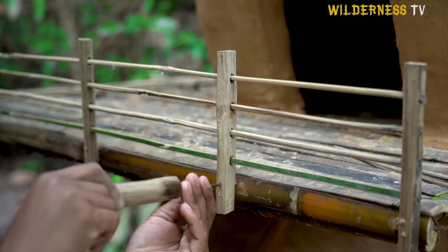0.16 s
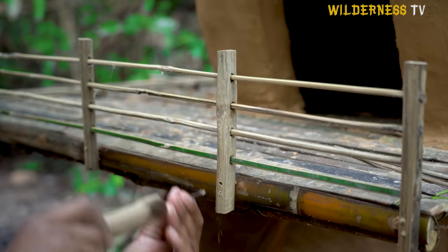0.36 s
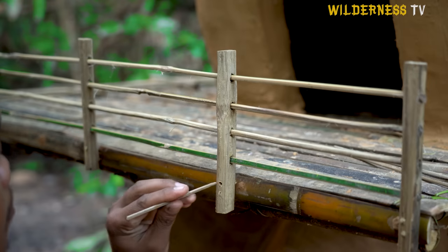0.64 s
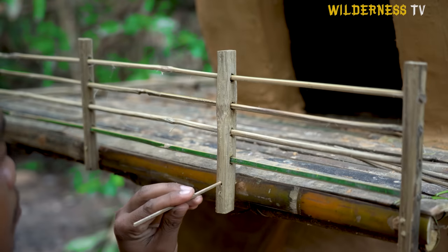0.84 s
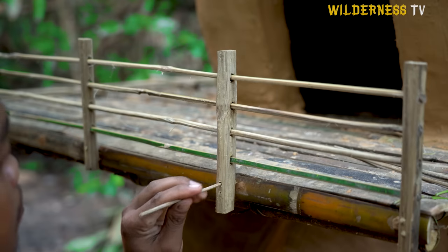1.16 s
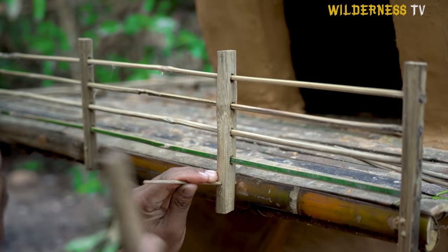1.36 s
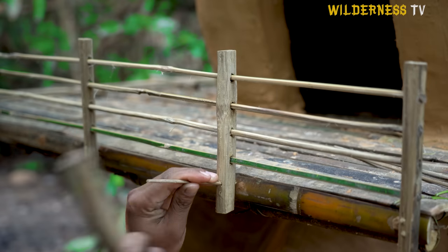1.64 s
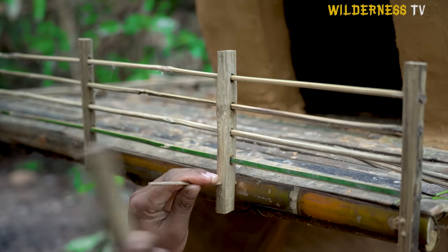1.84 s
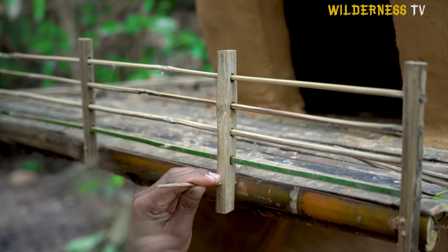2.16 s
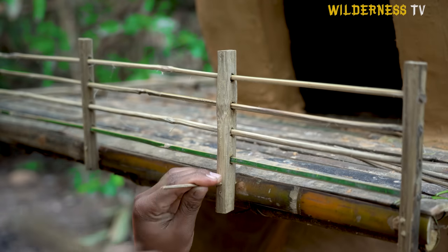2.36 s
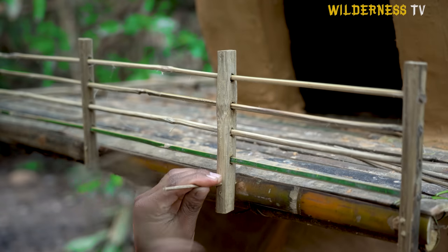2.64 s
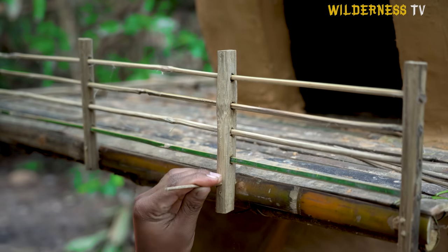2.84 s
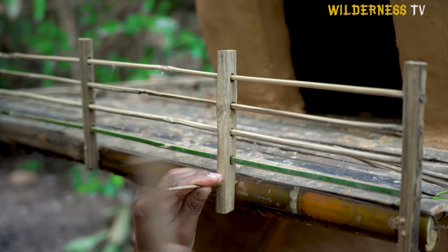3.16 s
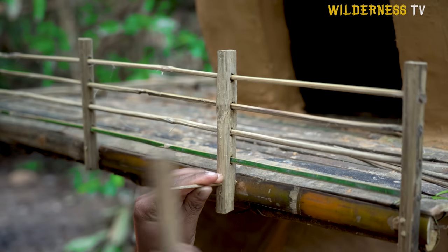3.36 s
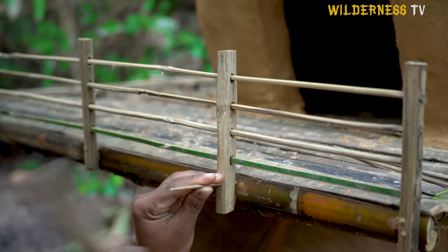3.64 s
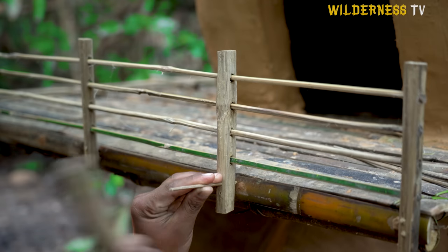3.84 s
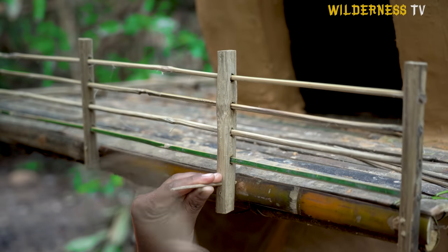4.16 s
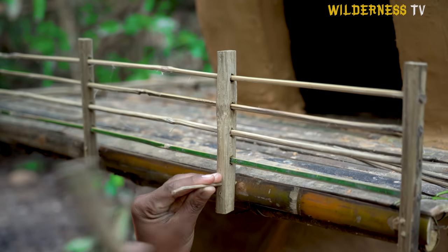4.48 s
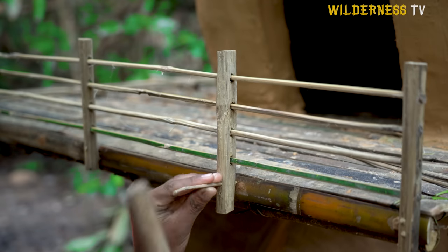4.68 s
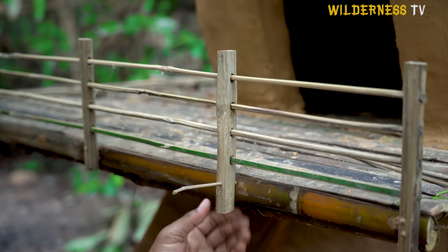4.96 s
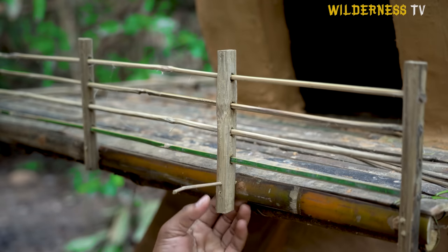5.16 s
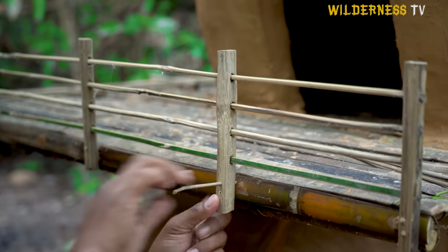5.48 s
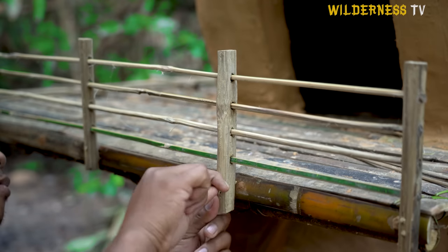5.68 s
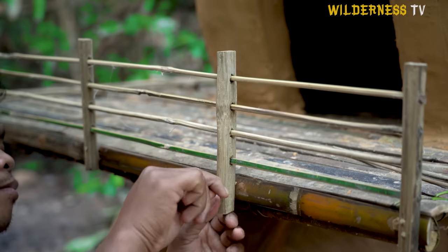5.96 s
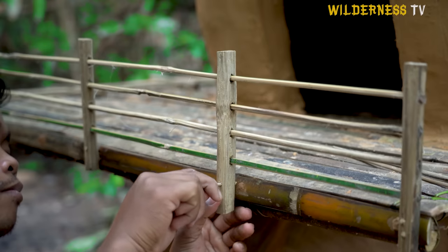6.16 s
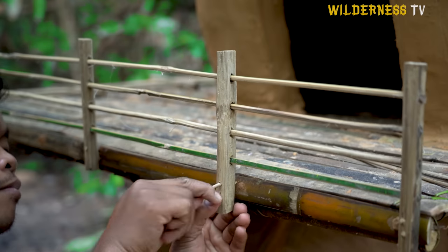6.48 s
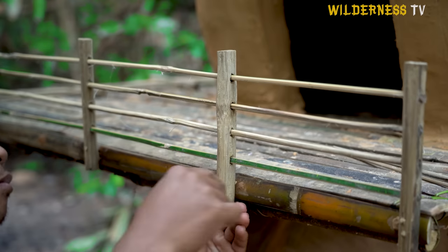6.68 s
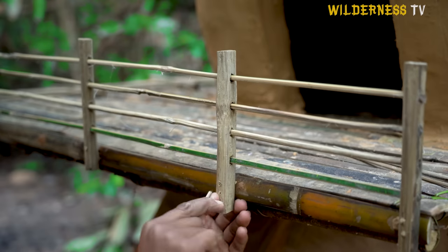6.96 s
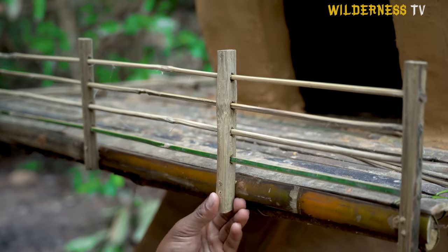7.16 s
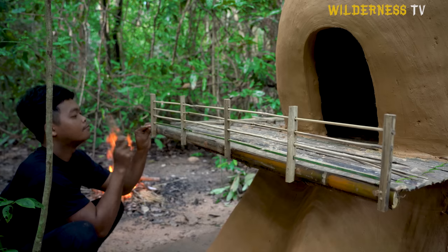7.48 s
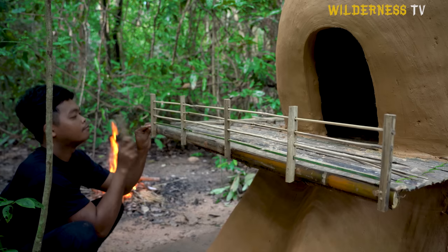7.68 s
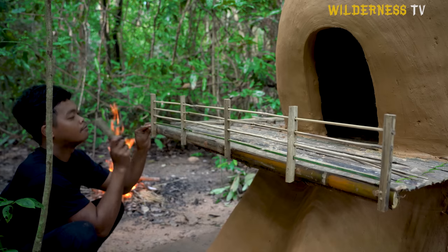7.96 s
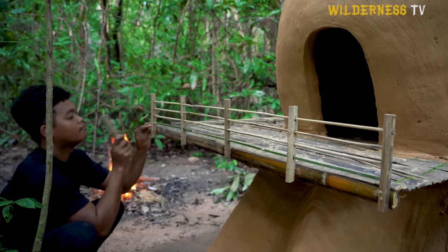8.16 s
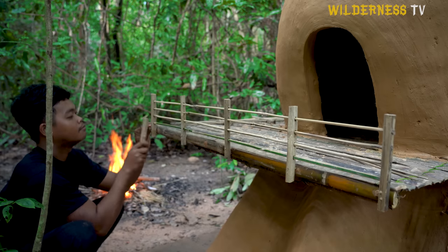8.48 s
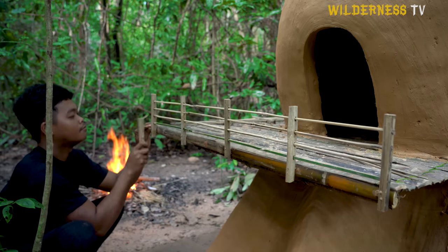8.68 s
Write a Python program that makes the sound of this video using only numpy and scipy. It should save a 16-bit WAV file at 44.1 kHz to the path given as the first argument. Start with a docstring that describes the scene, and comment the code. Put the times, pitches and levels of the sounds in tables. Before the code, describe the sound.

Close stereo microphones, outdoors among trees. Soft handling rustle, then a quick steady run of cracking wooden blows with a short ringing echo. A gap follows, with melodic slurred whistles and several dry bamboo snaps. Hammering resumes on another, hollower post, one blow clattering with a quick bounce. Raspy chirps, air and a high insect band run throughout.

```python
"""Mallet and bamboo in a forest

Close to the microphones a wooden mallet drives a peg into a bamboo railing; the peg's end is snapped off,
then a second post is hammered. Blows are ringing modes with a noise crack and a wash of echo; snaps are gritty noise.
Birds whistle, warble and chirp among the trees as gliding tones, over insects and still air made of shaped noise.
The recorder's limiter ducks the loudest peaks, so the forest's echo swells up behind the hard blows."""
import sys
import numpy as np
from scipy import signal
from scipy.fft import rfft, irfft, next_fast_len
from scipy.io import wavfile
from scipy.ndimage import uniform_filter1d, minimum_filter1d

SR = 44100
rng = np.random.default_rng(int(sys.argv[2]) if len(sys.argv) > 2 else 0)


def master(y):
    """Save y as 16-bit WAV."""
    cut = np.clip(np.atleast_2d(y).T, -1, 1)
    pcm = np.round(cut * 32767)  # scale
    wavfile.write(sys.argv[1], SR, pcm.astype(np.int16))


N = 389403
TIME = np.arange(N) / SR
ALONG = np.linspace(0, 1, 33)  # progress through a note, 0-1

# mallet on the peg, before the overall blow level:
# (time [s], force [dB], hollow middle [dB], treble [dB], top [dB])
PEG_BLOWS = [(1.6071, -6, -18.5, -2.5, -6), (1.841, -4.5, -0.5, 4, -5.5), (2.059, -2, -1.5, 2.5, 4),
             (2.2816, -1, -7, 5, 0.5), (2.5045, 11.5, -11, -1, 2.5), (2.743, 16, -13.5, -3, 4),
             (2.9822, 14.5, -11, 1, 5), (3.2034, 13.5, -8, 2, 8), (3.4232, 13, -7, 1.5, 6.5),
             (3.633, 10.5, -1.5, 2.5, 7), (3.8367, 9.5, 0.5, -8.5, -4), (4.053, 11, -6.5, -6, -19),
             (4.2716, 3.5, -6.5, -15, 6), (4.5039, 15, -16, -11, -9), (4.7045, -4.5, 0.5, -1.5, 19)]
# early echoes off near trunks: (delay [s], level against the direct sound [dB])
TRUNK_ECHOES = [(.012, -4.5), (.027, -7.5), (0.057, -18)]


def from_db(db):
    """Decibels to gain."""
    return 10 ** (np.asarray(db) / 20)


def at_hz(points, hz):
    """Read a curve on a log-frequency axis."""
    knots, values = np.transpose(points)
    return np.interp(np.log(np.maximum(hz, 1)), np.log(knots), values)


def add(out, s, sound):
    """Mix a sound in at a time in seconds."""
    start = max(round(s * SR), 0)
    out[:, start:start + sound.shape[-1]] += sound[..., :N - start]


def dying(t, t60):
    """Exponential decay, falling 60 dB in t60 seconds."""
    return np.exp(-np.log(1000) * t / t60)


def unit_energy(x):
    """Scale to a mean energy of one per channel."""
    return x / np.sqrt(np.mean(np.sum(x ** 2, axis=-1)))


def cut(x, hz, kind, order=2):
    """Butterworth filter."""
    return signal.sosfilt(signal.butter(order, hz, kind, fs=SR, output="sos"), x)


def bell(x, hz, q, db):
    """Lift or lower a band around hz, narrower for a higher q."""
    root_gain = from_db(db / 2)
    w = 2 * np.pi * min(hz, SR / 2 - 1) / SR
    k = np.sin(w) / (2 * q)
    top = [1 + k * root_gain, -2 * np.cos(w), 1 - k * root_gain]
    bottom = [1 + k / root_gain, -2 * np.cos(w), 1 - k / root_gain]
    return signal.lfilter(top, bottom, x)


def drift(rate, size):
    """Random wander: straight lines between normal draws, rate of them per second."""
    steps = np.arange(size) * rate / SR
    knots = np.arange(size // 20 + 2)
    return np.interp(steps, knots, rng.standard_normal(len(knots)))


def diffuse(spectrum, size):
    """Stereo noise from all around, alike in the bass and nearly unrelated in the treble."""
    # likeness of left and right: (frequency [Hz], likeness [0-1])
    likeness = [(60, 1), (500, 0.79), (1200, 0.44), (2500, 0.29), (5000, 0), (16000, 0.1)]
    length = next_fast_len(size) * 2
    hz = np.fft.rfftfreq(length, 1 / SR)
    mid, side = rfft(rng.standard_normal((2, length)))
    alike = np.clip(at_hz(likeness, hz), 0, 1)
    pair = np.sqrt(1 + alike) * mid + np.sqrt(1 - alike) * side * [[1], [-1]]
    return irfft(pair * from_db(at_hz(spectrum, hz)) * np.sqrt(SR) / 2)[:, :size]


def forest(x, linger, build_s):
    """Countless trunks and leaves scatter the sound back; each octave dies at its own rate."""
    # colour of the echo: (frequency [Hz], relative level [dB])
    echo_colour = [(150, 15.5), (700, -9), (1800, -4.5), (4000, 1), (8500, 10.5), (15000, 5)]
    # its decay before linger stretches or shortens it: (frequency [Hz], t60 [s])
    echo_decay = [(150, 0.38), (1000, 0.5), (3500, 0.54), (9000, 0.32), (16000, 0.16)]
    t, edges = TIME[:SR], 80 * 2. ** np.arange(9)
    scatter = diffuse(echo_colour, size=SR)
    tail = np.zeros((2, SR))
    for lo, hi in zip(edges, edges[1:]):
        t60 = linger * at_hz(echo_decay, np.sqrt(lo * hi))
        tail += cut(scatter, [lo, hi], "band") * dying(t, t60)
    response = unit_energy(tail * (1 - np.exp(-t / build_s)))
    return signal.fftconvolve(x, response, axes=-1)[:, :N]


def mallet(blows, modes, level_db, crack_db, crack_s, echo_db, echo_t60, slap_db, slap_t60,
           contact_s, spread, vary_db, low_hz):
    """Each blow rings the modes with a contact crack; a slap off the hut and a wash from the trees follow."""
    # splintery crack of the contact: (frequency [Hz], relative level [dB per Hz])
    crack_spectrum = [(100, -41), (350, -45), (900, -5), (2000, 2.5), (4000, 5), (6500, -2), (10000, -7.5),
                      (15000, -23)]
    # a blow as it comes back from all sides: (frequency [Hz], relative level [dB per Hz])
    wash_spectrum = [(100, -30), (350, -15.5), (600, -9.5), (1000, -9), (1800, -4), (2800, -2),
                     (3900, -0.5), (4500, -0.5), (5600, -5.5), (7300, -8.5), (8800, -8), (10000, -12.5),
                     (11500, -17.5), (15000, -29)]
    # narrow bands where the wash rings on or is softened: (frequency [Hz], Q [-], gain [dB])
    wash_bands = [(2100, 11, -1), (3800, 27, 4), (8570, 16, 4)]
    out, t = np.zeros((2, N)), TIME[:SR // 2]
    hz, width, mode_db = np.transpose(modes)[:, :, None]
    # higher modes reach the two microphones further out of step
    lag = spread * np.minimum(hz / 4000, 1) * rng.choice([-1, 1], hz.shape)
    phase = rng.uniform(0, 2 * np.pi, hz.shape) + lag * np.array([1, -1])[:, None, None]
    rings = from_db(mode_db) * width * np.exp(-np.pi * width * t) * np.sin(2 * np.pi * hz * t + phase)
    onset = 1 - np.exp(-t / contact_s)
    slap_fade = from_db(slap_db) * unit_energy(dying(t, slap_t60))
    fade = from_db(echo_db) * unit_energy(dying(t, echo_t60)) + slap_fade
    for s, force_db, middle_db, treble_db, top_db in blows:
        mode_gains = from_db(vary_db * rng.standard_normal(hz.shape))
        body = unit_energy((rings * mode_gains).sum(axis=1) * onset)
        # the wood slips in its hole for a few milliseconds, then grips
        grip = np.exp(-(t / crack_s) ** 4)
        crack = unit_energy(diffuse(crack_spectrum, size=len(t)) * onset * grip)
        wash = diffuse(wash_spectrum, size=len(t))
        for band_hz, q, band_db in wash_bands:
            wash = bell(wash, band_hz, q, band_db)
        knock = body + from_db(crack_db) * crack + wash / wash.std() * fade * onset
        knock = bell(knock, 1055, 0.71, middle_db)
        knock = bell(knock, 8300, 0.94, treble_db)
        knock = bell(knock, 12870, 1.33, top_db)
        add(out, s, from_db(level_db + force_db) * cut(knock, low_hz, "high"))
    return out


def rail_twang(level_db, start_hz, end_hz, settle_s, t60):
    """Blows set the thin rails swinging until the peg is seated; the pitch sinks as the swing dies."""
    follows, seated_s = 0.72, 4.2  # share of a blow's force dB; time of the seating
    out, t = np.zeros((2, N)), TIME[:SR // 4]
    pitch = end_hz + (start_hz - end_hz) * np.exp(-t / settle_s)
    swing = np.sin(2 * np.pi * np.cumsum(pitch) / SR)
    twang = swing * dying(t, t60) * (1 - np.exp(-t / settle_s))
    for s, force_db, *colour in PEG_BLOWS:
        if s < seated_s:
            add(out, s, from_db(level_db + follows * force_db) * twang)
    return out


def handling(top_hz, bump_t60):
    """Bamboo fibres break in gritty bursts of noise; hands knock dully on the deck."""
    # bamboo handled and snapped: (time [s], starting level [dB], t60 [s], lowest frequency [Hz])
    snaps = [(0.003, -32.5, 0.5, 3500), (0.464, -34, 0.3, 3000), (0.491, -36, 0.19, 3000),
             (1.655, -28.5, 0.024, 4020), (5.197, -29, 0.11, 2500), (5.243, -17.5, 0.038, 3400),
             (6.374, -16.5, 0.036, 2400), (6.388, -24, 0.15, 2400), (6.407, -16.5, 0.11, 2400),
             (6.788, -20.5, 0.025, 2400), (6.795, -12, 0.071, 2380), (6.998, -30.5, 0.072, 3000),
             (8.306, -35, 0.14, 5000)]
    # hands bump the deck: (time [s], starting level [dB], frequency [Hz])
    bumps = [(0.408, -36.5, 610), (5.198, -36.5, 243), (5.245, -31.5, 650), (5.262, -39, 245),
             (5.261, -38.5, 990)]
    out, t = np.zeros((2, N)), TIME[:SR // 5]
    for s, db, t60, low_hz in snaps:
        grit = from_db(4 * drift(1500, size=len(t)))
        fibres = rng.standard_normal((2, len(t))) * grit
        fibres = cut(fibres, low_hz, "high")
        fibres = cut(fibres, min(top_hz, SR / 2 - 1), "low", order=1)
        add(out, s, from_db(db) * fibres / fibres.std() * dying(t, t60))
    for s, db, hz in bumps:
        thud = cut(rng.standard_normal(len(t)), [hz / 1.3, hz * 1.52], "band")
        add(out, s, from_db(db) * thud / thud.std() * dying(t, bump_t60))
    return out


def whistle(note, waver, waver_rate, flutter_db, edge_s=0.0018):
    """A near-pure tone gliding through its points; a fast waver turns it into a rasp."""
    s, hz, db = np.transpose(note)
    t = TIME[:SR // 2] + s[0]
    glide = uniform_filter1d(np.interp(t, s, hz), SR // 150)
    pitch = glide * (1 + waver * drift(waver_rate, size=len(t)))
    gate = np.clip(np.minimum(t - s[0], s[-1] + edge_s - t) / edge_s, 0, 1)
    level = from_db(np.interp(t, s, db) + flutter_db * drift(75.3, size=len(t)))
    return np.sqrt(2) * level * gate * np.sin(2 * np.pi * np.cumsum(pitch) / SR)


def swell(s, length, start_hz, end_hz, db):
    """A long note rises, quickly at first, while its pitch glides ever faster; rows of (s, Hz, dB)."""
    swell_db, swell_power, glide_power = 20, 5.1, 1.4  # starts swell_db down
    pitch = start_hz + (end_hz - start_hz) * ALONG ** glide_power
    return np.transpose([s + length * ALONG, pitch, db - swell_db * (1 - ALONG) ** swell_power])


def slur(s, length, start_hz, middle_hz, end_hz, db):
    """A short note bends through one smooth arc, loudest in its middle; rows of (s, Hz, dB)."""
    edge_db = 5  # softer by this at both ends
    pitch = start_hz + (end_hz - start_hz) * ALONG
    edge = (2 * ALONG - 1) ** 2
    bend = (middle_hz - (start_hz + end_hz) / 2) * (1 - edge)
    return np.transpose([s + length * ALONG, pitch + bend, db - edge_db * edge])


def trills():
    """The same slur again and again at an even pace."""
    # before the birds' mix levels: (from [s], until [s], period [s], note length [s],
    # start pitch [Hz], middle pitch [Hz], end pitch [Hz], level [dB])
    trill_rows = [(2.161, 2.21, .034, 0.028, 1835, 2018, 1930, -30.5),
                  (2.392, 2.52, .058, .042, 1604, 2740, 3100, -30),
                  (5.938, 6.235, .088, .042, 1724, 1860, 1890, -31.5)]
    return [slur(s, *note) for start, until, period, *note in trill_rows
            for s in np.arange(start, until, period)]


def sing(notes, waver, waver_rate, flutter_db):
    """Lay whistled notes out in time."""
    out = np.zeros((2, N))
    for note in notes:
        add(out, note[0][0], whistle(note, waver, waver_rate, flutter_db))
    return out


def off_trunks(x):
    """The sound with its early echoes off near trunks."""
    out = x.copy()
    for delay, db in TRUNK_ECHOES:
        add(out, delay, from_db(db) * x)
    return out


def songbirds(direct_db, echo_db, far_direct_db, far_echo_db, pan_db):
    """Fluting phrases, pure in the whistles and raspy in the trills; far birds arrive mostly as echo."""
    # all levels stand before the direct and echo gains
    # near bird's long swelling whistles:
    # (time [s], length [s], start pitch [Hz], end pitch [Hz], level [dB])
    near_whistles = [(1.459, .38, 1877, 1585, -41), (1.90, 0.16, 1629, 1474, -32.5),
                     (5.505, 0.36, 1970, 2185, -33)]
    # its short slurred notes:
    # (time [s], length [s], start pitch [Hz], middle pitch [Hz], end pitch [Hz], level [dB])
    near_slurs = [(2.134, 0.031, 2230, 1940, 1860, -35), (2.188, 0.038, 1877, 2025, 2150, -26.5),
                  (2.303, .04, 1234, 1565, 2790, -37.5), (2.338, 0.042, 2850, 3040, 2900, -22),
                  (5.821, 0.042, 2216, 2287, 2260, -26), (6.239, 0.095, 1898, 2257, 2403, -27.5),
                  (6.342, 0.048, 2380, 2320, 2036, -23.5), (6.35, 0.061, 2327, 2440, 2480, -27.5),
                  (6.547, 0.09, 2200, 1828, 1660, -25), (6.806, 0.071, 2200, 1880, 1580, -24.5),
                  (7.005, 0.057, 2033, 2142, 2110, -25.5), (7.055, 0.0266, 2110, 1923, 1560, -30)]
    # whistles further off: (time [s], length [s], start pitch [Hz], end pitch [Hz], level [dB])
    far_whistles = [(2.542, .36, 940, 870, -53)]
    # slurs further off:
    # (time [s], length [s], start pitch [Hz], middle pitch [Hz], end pitch [Hz], level [dB])
    far_slurs = [(6.472, 0.074, 1413, 1300, 1230, -32.5), (6.72, 0.064, 1345, 1330, 1140, -30),
                 (6.949, 0.037, 1170, 1144, 1360, -29), (7.149, 0.032, 1050, 1176, 1445, -31.5),
                 (7.222, 0.073, 1247, 1330, 1280, -37), (7.406, 0.052, 1325, 1183, 1210, -31.5),
                 (7.491, .065, 1584, 1460, 1250, -37.5)]
    near = sing([swell(*row) for row in near_whistles], waver=.006, waver_rate=200, flutter_db=1.8)
    near += sing([slur(*row) for row in near_slurs], waver=.018, waver_rate=260, flutter_db=3.2)
    near += off_trunks(sing(trills(), waver=.04, waver_rate=700, flutter_db=3.5))
    far_notes = [swell(*row) for row in far_whistles] + [slur(*row) for row in far_slurs]
    far = sing(far_notes, waver=.022, waver_rate=200, flutter_db=3)
    to_forest = from_db(echo_db) * near + from_db(far_echo_db) * far
    echo = forest(to_forest, linger=1.28, build_s=0.0018)
    direct = from_db(direct_db) * near + from_db(far_direct_db) * far
    return (direct + echo) * from_db([[pan_db / 2], [-pan_db / 2]])


def chirper(direct_db, echo_db, dull_hz):
    """Raspy down-slurs from deeper in the trees; foliage roughens each path its own way and dulls the tail."""
    # a second bird's sharp down-slur: (time after its start [s], pitch [Hz], relative level [dB])
    chirp_shape = [(0, 5113, 4.5), (.013, 4050, 2), (.029, 3240, -0.5), (.05, 2819, -1), (.078, 2600, -3.5)]
    # its calls, before the mix levels: (time [s], level [dB], pan, plus is left [dB], echo [dB])
    chirps = [(0.579, -33.5, 3, -7.5), (2.068, -37.5, -1.5, 9), (2.712, -35, 0, 5), (2.911, -34.5, -2, 0.5),
              (3.875, -34, -1, 0), (4.087, -31, -1, -3.5), (5.81, -29, -2, 2), (7.928, -27, 0, -3),
              (8.004, -34, -4, 1)]
    out, scattered = np.zeros((2, 2, N))
    for s, db, pan_db, wet_db in chirps:
        for delay, bounce_db in [(0, 0)] + TRUNK_ECHOES:
            call = whistle(chirp_shape, waver=.052, waver_rate=1800, flutter_db=3)
            path_db = db + bounce_db
            call = call * from_db([[path_db + pan_db / 2], [path_db - pan_db / 2]])
            add(out, s + delay, call)
            add(scattered, s + delay, from_db(wet_db) * call)
    echo = forest(cut(scattered, dull_hz, "low"), linger=0.71, build_s=0.0013)
    return from_db(direct_db) * out + from_db(echo_db) * echo


def thin_call(direct_db, echo_db):
    """A thin, high, rising and swelling whistle with a faint octave above it."""
    # before the mix levels: (time [s], length [s], start pitch [Hz], end pitch [Hz], level [dB])
    thin_calls = [(7.815, .125, 5780, 6500, -34.5)]
    octave_db = -13
    partials = [swell(s, length, k * start_hz, k * end_hz, db + (k - 1) * octave_db)
                for s, length, start_hz, end_hz, db in thin_calls for k in (1, 2)]
    call = sing(partials, waver=.006, waver_rate=300, flutter_db=2)
    return from_db(direct_db) * call + from_db(echo_db) * forest(call, linger=.6, build_s=.003)


def background(pulse_db, pulse_rate, shimmer_db):
    """Still air, and many insects whose buzzing merges into one restless band."""
    # distant leaves and air: (frequency [Hz], level [dB per Hz])
    air = [(25, -120), (40, -108), (65, -100.5), (100, -90.5), (200, -86), (500, -80.5), (1000, -80.5),
           (2000, -81), (4000, -80.5), (8000, -83), (12500, -85.5), (16000, -91.5)]
    # insect chorus, before its restless gain: (frequency [Hz], level [dB per Hz])
    insects = [(4000, -100), (4800, -78), (5200, -69), (5550, -66), (6000, -70.5), (6500, -83),
               (7500, -100)]
    buzz = from_db(pulse_db * drift(pulse_rate, size=N) + shimmer_db * drift(180, size=N))
    return diffuse(air, size=N) + buzz * diffuse(insects, size=N)


def scene():
    """The work close by, with birds and insects around it."""
    # mallet on the second post, before the overall blow level:
    # (time [s], force [dB], hollow middle [dB], treble [dB], top [dB])
    post_blows = [(7.4786, 1.5, 4.7, 1.5, 12), (7.9113, 4.5, 0.67, -3.5, 11), (8.1255, 0.5, 7.3, 0, 0.93),
                  (8.3339, 6.5, 1.1, -2.5, 4.5), (8.549, 1.5, 6.4, 0.5, 10.4), (8.7549, 2.5, 4.5, 7, 2.7)]
    # a glancing blow on a loose stake and its bounce, before the overall blow level:
    # (time [s], force [dB], hollow middle [dB], treble [dB], top [dB])
    stake_blows = [(7.6903, 8, -17, -3.5, -7), (7.6986, 2, 11.5, -7, 5)]
    # what peg, post and stake ring with: (frequency [Hz], width [Hz], relative level [dB])
    peg_modes = [(556, 38, -27), (670, 20, -24), (848, 35, -12.5), (1257, 33, -10), (1626, 88, -4),
                 (2093, 108, -1.5), (2448, 67, -22), (2847, 280, -4), (3253, 97, -4.5), (3927, 164, 0.5),
                 (4820, 270, -5.5), (5120, 59, -11.5), (5650, 420, -11), (6340, 140, -11), (7100, 320, -22),
                 (8630, 180, -10), (10290, 300, -21), (11500, 570, -20)]
    post_modes = [(437, 34, -12), (570.5, 36, 1), (637, 34, -7), (1008, 13, -11), (1372, 38, -7),
                  (1545, 26, -8), (1947, 39, 3), (2370, 80, -6), (3050, 440, -1), (3650, 250, -15),
                  (4000, 130, -0.5), (4560, 540, 3), (4760, 170, -9), (6350, 140, 1), (8200, 250, -32),
                  (10230, 460, -15)]
    stake_modes = [(590, 45, -8), (1410, 100, -2), (1530, 31, 0.5), (1830, 100, -16), (2580, 130, 0),
                   (2670, 140, 2), (3150, 140, 3.5), (3250, 130, -13), (3970, 190, -0.5)]
    peg = mallet(PEG_BLOWS, peg_modes, level_db=13.0, crack_db=-2.0, crack_s=0.0065,
                 echo_db=-10.0, echo_t60=0.5, slap_db=-12.5, slap_t60=0.1,
                 contact_s=0.0011, spread=0.29, vary_db=3.0, low_hz=315)
    post = mallet(post_blows, post_modes, level_db=7.5, crack_db=-6.5, crack_s=0.0023,
                  echo_db=-5, echo_t60=0.38, slap_db=-5, slap_t60=0.065,
                  contact_s=0.00083, spread=0.4, vary_db=3.0, low_hz=306)
    stake = mallet(stake_blows, stake_modes, level_db=9.5, crack_db=-11, crack_s=0.0022,
                   echo_db=-9.5, echo_t60=0.42, slap_db=-2.5, slap_t60=0.07,
                   contact_s=0.0005, spread=0.35, vary_db=0.6, low_hz=330)
    blows = (peg + post + stake) * from_db([[.5], [-.5]])  # a touch to the left
    twang = rail_twang(level_db=-40.0, start_hz=418, end_hz=315.7, settle_s=0.022, t60=0.21)
    hands = handling(top_hz=10400, bump_t60=0.062)
    hands = hands + from_db(-16) * forest(hands, linger=1.0, build_s=0.0037)
    # the songbirds sit a touch to the right
    birds = songbirds(direct_db=-3.5, echo_db=4, far_direct_db=-6.0, far_echo_db=9.5, pan_db=-1.0)
    birds = birds + chirper(direct_db=-2.5, echo_db=7.5, dull_hz=3970)
    birds = birds + thin_call(direct_db=-6.0, echo_db=0)
    bed = background(pulse_db=1.6, pulse_rate=22, shimmer_db=1.06)
    return blows + twang + hands + birds + bed


def limiter(x, ceiling, release_s):
    """The gain drops just ahead of each peak over the ceiling and creeps back afterwards."""
    window = SR // 700
    peak = -minimum_filter1d(-abs(x).max(axis=0), window)
    depth = np.maximum(1 - ceiling / np.maximum(peak, ceiling), 1e-9)
    # the deepest reduction so far, each one fading at the release rate
    held = np.exp(np.maximum.accumulate(np.log(depth) + TIME / release_s) - TIME / release_s)
    return x * (1 - uniform_filter1d(held, window))


def record(dry):
    """The recorder: rumble filter and limiter, then a steep cut above 16 kHz."""
    limited = limiter(cut(dry, hz=52, kind="high"), ceiling=0.92, release_s=0.067)
    return signal.sosfilt(signal.ellip(10, .1, 80, 16000, fs=SR, output="sos"), limited)


dry = scene()
out = record(dry)
master(out)
```